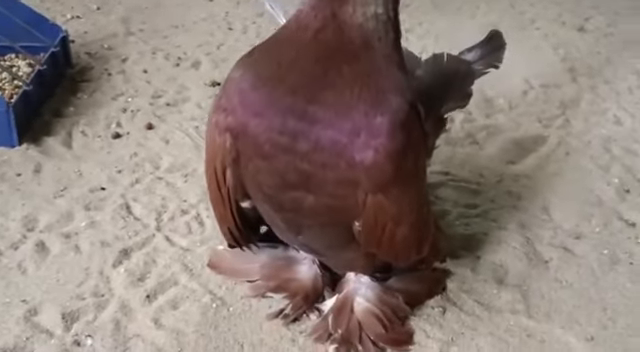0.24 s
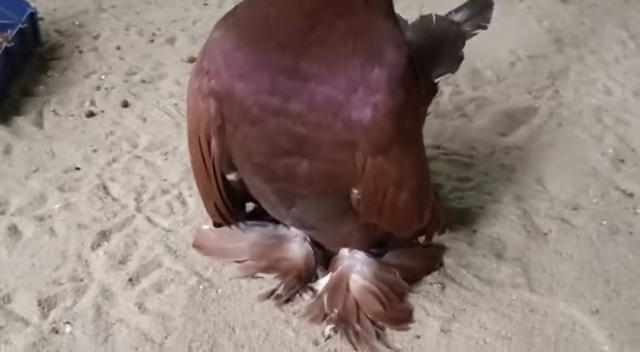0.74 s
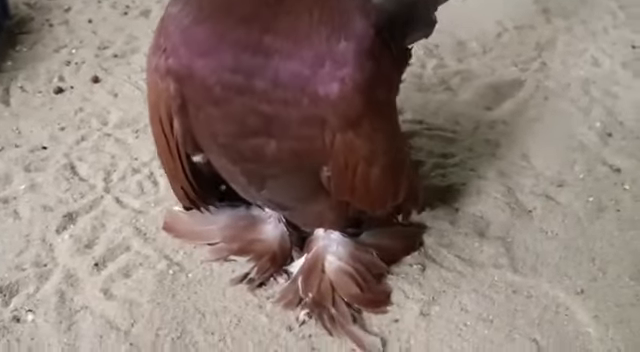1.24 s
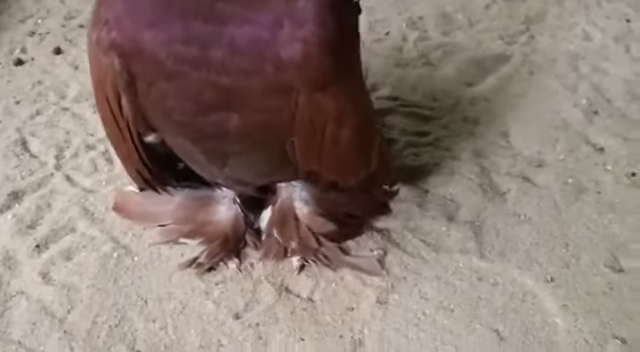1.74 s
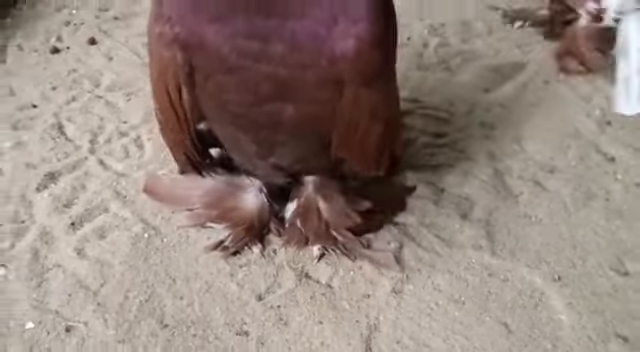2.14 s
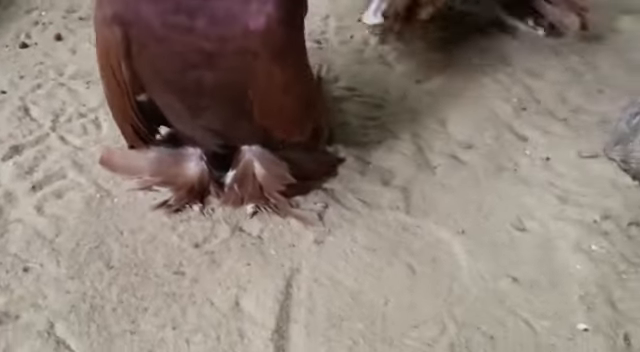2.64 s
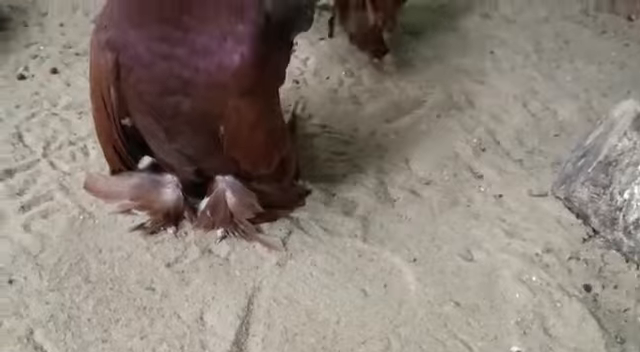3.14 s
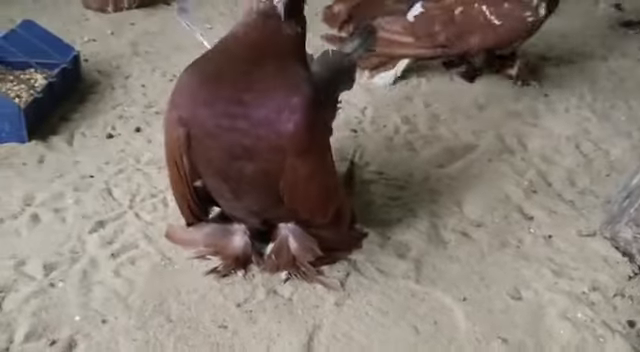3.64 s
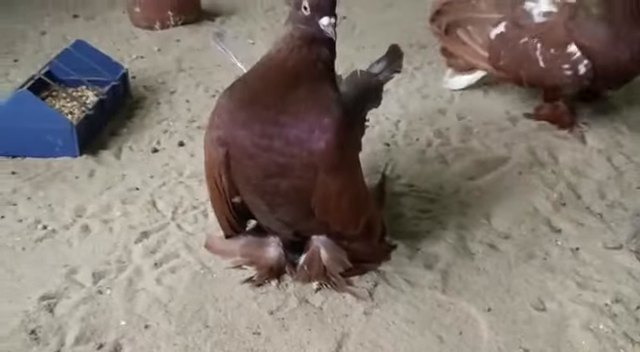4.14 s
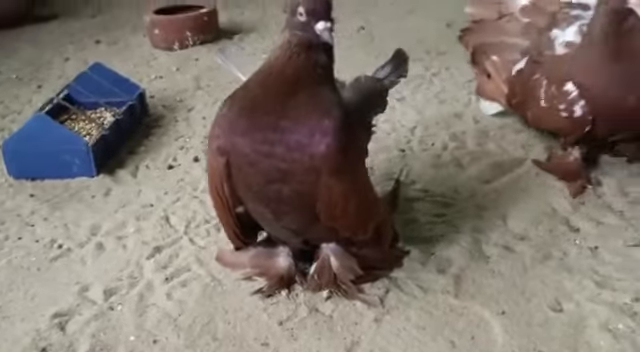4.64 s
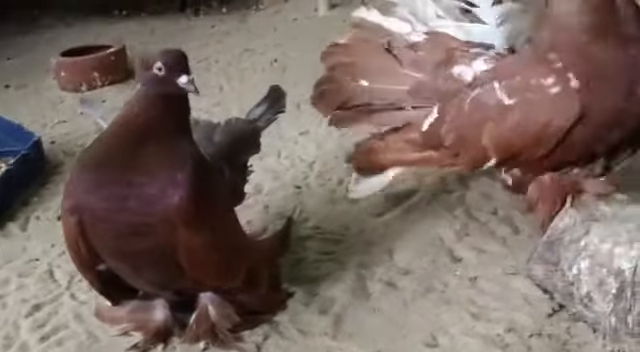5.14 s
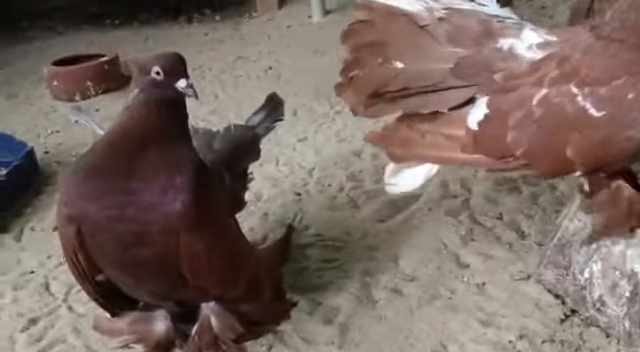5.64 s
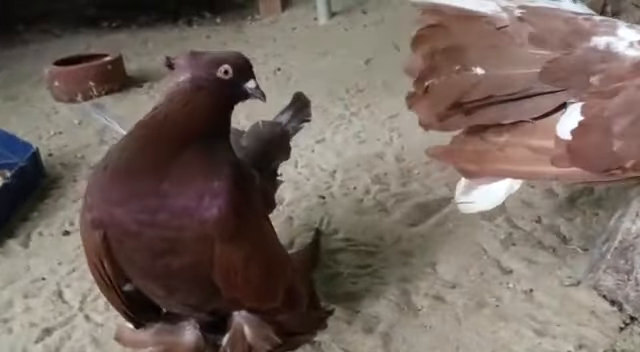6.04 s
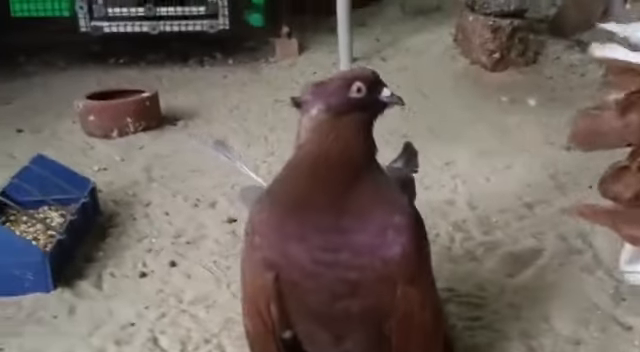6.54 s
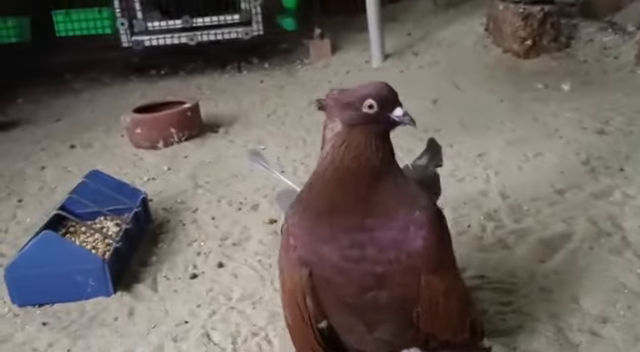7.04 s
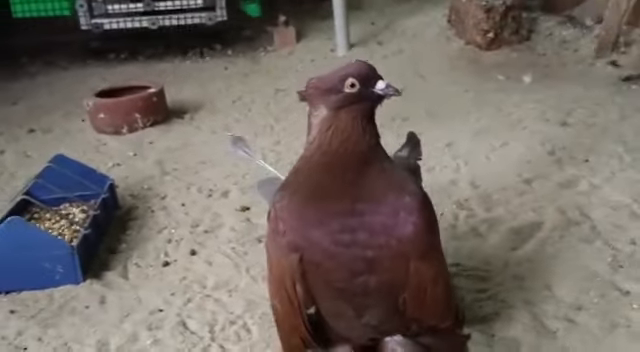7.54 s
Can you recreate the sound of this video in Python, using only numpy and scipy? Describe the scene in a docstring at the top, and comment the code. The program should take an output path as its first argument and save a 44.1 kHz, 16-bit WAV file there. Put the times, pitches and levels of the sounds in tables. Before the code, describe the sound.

Close in a small sandy loft, pigeons give short stuttered notes and long, fluttering, falling coos, low and muffled. Soft bumps come first, then a quick burst of wingbeats with sand scuffs. Claws rasp, then a sharp hard knock on the left stands out, followed by a thin sliding whistle. Hoarse young squeals and faint coos sit behind, over soft air noise and low hum.

```python
"""Pigeons court on the sandy floor of a small loft, close to a phone, over steady air noise and a low hum.
From the start short stuttered notes and long, throbbing, falling coos come and go: tones fluttered and
muffled by the crop. Young birds squeal hoarsely further back, faint coos murmur, and filtered noise makes
feet scuff and grit tick. A soft bump and two knocks on a board, rung from damped modes, come first; then
wings beat, claws rasp, harder knocks fall, and a thin whistle slides down and frays among later coos."""
import sys
import numpy as np
from scipy import signal
from scipy.fft import rfft, irfft, next_fast_len
from scipy.io import wavfile
from scipy.ndimage import map_coordinates

SR = 44100
rng = np.random.default_rng(int(sys.argv[2]) if len(sys.argv) > 2 else 0)


def inscribe(sig):
    """Save sig as 16-bit PCM at rate SR to the path in sys.argv[1].

    A 1-D sig is mono; a 2-D sig holds one channel per row.
    Samples are clipped to [-1, 1] before scaling.
    """
    pcm = np.round(np.clip(np.atleast_2d(sig).T, -1, 1) * 32767)
    wavfile.write(sys.argv[1], SR, pcm.astype(np.int16))


N = 343539
TIME = np.arange(N) / SR

# wing strokes close to the microphone, which also sweep the sand:
# [t/s, level/dB ahead of the trims in wings() and feet(), length/s]
WING_STROKES = [(1.726, -35, 0.037), (1.849, -21.5, .024), (1.88, -24, .043), (1.954, -17.5, 0.022),
                (1.999, -23, .028), (2.034, -25, 0.027), (2.095, -30.5, 0.045)]


def undb(db):
    """Decibels to gain."""
    return 10 ** (np.asarray(db) / 20)


def unit(x):
    """Scale to rms 1."""
    return x / np.sqrt(np.mean(x ** 2) + 1e-20)


def clock(length):
    """Sample times of a sound of this length in seconds."""
    return np.arange(max(int(length * SR), 16)) / SR


def colour(x, points):
    """Filter by a spectrum of [f/Hz, gain/dB] points, joined by straight lines over log frequency."""
    hz, db = np.transpose(points)
    size = next_fast_len(x.shape[-1] + 2048)
    f = np.maximum(np.fft.rfftfreq(size, 1 / SR), 1)
    gain = undb(np.interp(np.log(f), np.log(hz), db))
    return irfft(rfft(x, size) * gain, size)[..., :x.shape[-1]]


def brighten(x, db):
    """Lift or lower the top treble, by the full amount from 13 kHz up."""
    return colour(x, [(4000, 0), (13000, db)])


def butter(x, hz, kind, order=2):
    """Butterworth filter."""
    sos = signal.butter(order, np.minimum(hz, .45 * SR), kind, fs=SR, output="sos")
    return signal.sosfilt(sos, x)


def walk(rate):
    """Random wander of rms 1 that heads for a new value rate times a second."""
    steps = rng.standard_normal(N // 8)
    return unit(map_coordinates(steps, [TIME * rate], order=1, mode="wrap"))


def arch(t, length):
    """Swell and fade evenly over a length of time."""
    return np.sin(np.pi * np.clip(t / length, 0, 1)).clip(0) ** 1.2


def swell(u):
    """Quick rise and long fade as u runs from 0 to 1."""
    return np.sin(np.pi * u ** .7).clip(0) ** .8


def pan(x, left_db):
    """Place a sound in stereo, left_db louder on the left than on the right."""
    return x * undb(np.array([[left_db], [-left_db]]) / 2)


def add(out, start, x):
    """Mix a sound in from a start time in seconds, trimmed at both ends of the scene."""
    i = int(start * SR)
    x, i = x[..., max(-i, 0):], max(i, 0)
    out[..., i:i + x.shape[-1]] += x[..., :max(N - i, 0)]


def piece(x, t):
    """A random stretch of a long signal, as long as t."""
    i = int(rng.random() * (N - len(t)))
    return x[..., i:i + len(t)]


def room(x, t60, wet_db, lag=0):
    """Direct sound, reaching the left port lag samples late, and the diffuse ring of the loft (t60 in s)."""
    t = clock(0.99)
    onset = 1 - np.exp(-t / 0.00052)
    tail = rng.standard_normal((2, len(t))) * undb(-60 * t / t60) * onset
    tail /= np.sqrt(np.sum(tail ** 2, axis=1, keepdims=True))
    x = x * np.ones((2, 1))
    direct = np.array([np.interp(TIME - lag / SR, TIME, x[0]), x[1]])
    return direct + undb(wet_db) * signal.fftconvolve(x, tail, axes=1)[:, :N]


def syrinx(hz, depth, throb_hz, chance):
    """A nearly pure tone, nicked by an uneven flutter; its pitch wavers, and slips as the flutter chokes it."""
    flutter = np.cos(2 * np.pi * np.cumsum(throb_hz * np.exp(.3 * chance[0])) / SR)
    choke = np.clip(depth, 0, 1) * ((1 - flutter) / 2) ** 3
    waver = .04 * depth * chance[1]
    slip = .3 * choke * chance[2]
    phase = 2 * np.pi * np.cumsum(hz * (1 + waver + slip)) / SR
    rasp = .22 * depth * chance[3] * np.cos(phase)
    # the octave comes through when the pitch sinks far enough for it to fit the crop resonance
    octave_db = np.interp(hz, [200, 245, 275, 330], [-10, -14, -19, -24])
    tone = np.sin(phase) + rasp + undb(octave_db) * np.sin(2 * phase)
    return unit((1 - 1.3 * choke) * tone)


def crop(x):
    """The swollen crop behind a closed beak passes only the lows."""
    return butter(x, [170, 530], "band", order=6)


def coos():
    """Long coos and short notes, sung with closed beak: a fluttered syrinx tone through the crop."""
    # long coos, levels ahead of the crop: [t/s, length/s, opening f/Hz, settling/s, held f/Hz before sag,
    #  sag/(Hz/s), level/dB, attack/s, rise/s, fade/(dB/s), release/s, middle throb f/Hz,
    #  throb depth/0-1, left-right/dB]
    long_coos = [(0.169, 0.56, 410, .07, 340, 165.7, -31.5, .04, .13, 33, 0.074, 36.2, 0.81, 1),
                 (.724, 0.47, 454.3, .075, 354, 186.7, -37, 0.013, 0.13, 9.5, 0.138, 17.4, 0.39, -0.5),
                 (0.954, .515, 492, 0.04, 492, 597, -25.5, .055, 0.28, 78.5, 0.064, 26, 0.33, -2),
                 (2.799, 0.3, 295, 0.0994, 340, 60, -28.5, 0.014, 0.22, 13.5, 0.022, 29.6, 0.53, -0.5),
                 (4.11, 0.37, 445, 0.054, 334.8, 273, -28.5, 0.0094, .095, 22.5, 0.076, 24.9, 0.51, 3),
                 (4.937, .42, 505, .13, 344.3, 105, -29, 0.012, 0.36, 1.5, 0.028, 32, .6, 1.5),
                 (5.565, 0.51, 420, 0.12, 375.9, 99, -24.5, 0.013, 0.17, 7, 0.12, 36, 0.57, 1.5),
                 (7.095, .34, 430, .047, 343.7, 158.5, -32, 0.054, 0.057, 19.5, 0.09, 16.7, 0.28, 0)]
    # short stuttered notes, levels ahead of the crop: [t/s, middle f/Hz, level/dB, pop width/s]
    short_notes = [(0.051, 322, -31, 0.0052), (0.11, 305, -31, .007), (1.098, 392, -31.5, 0.0065),
                   (2.585, 326, -30, 0.005), (2.655, 309, -28, 0.0047), (2.708, 307, -30, 0.0084),
                   (2.767, 337, -29.5, 0.0039), (3.104, 304.6, -22.5, .008), (3.162, 294, -23, 0.0053),
                   (3.222, 283, -32.5, 0.0064), (3.273, 292.9, -33, 0.007), (3.774, 274, -33, 0.0037),
                   (3.886, 314, -30.5, 0.0028), (4.02, 292.5, -26.5, 0.0025), (4.43, 438, -27, 0.018),
                   (4.483, 466, -33, 0.0034), (4.564, 454, -29, 0.0052), (4.717, 338, -28.5, 0.0056),
                   (4.785, 327, -30.5, 0.00538), (4.846, 320, -31, 0.0039), (4.903, 321, -31.5, 0.0048),
                   (4.964, 325.4, -28, 0.0054), (5.371, 344.6, -23.5, 0.0096),
                   (5.416, 326.2, -23.5, 0.0045), (5.448, 338.2, -27, 0.0093),
                   (5.666, 399.4, -22.5, 0.0063), (6.657, 296, -35.5, 0.0073), (6.744, 338, -31.5, 0.0047),
                   (6.818, 313, -30, 0.0047), (6.889, 316.4, -34.5, 0.0046), (6.979, 304, -35.5, 0.0043)]
    start_db, end_edge_s = -12.5, 0.0031  # soft start of each coo, and the ramp that closes it
    release_db, release_drop = -12.5, .22  # level and share of the pitch lost together at the end
    faint_db = -31.5  # coos no louder than this come from further off and carry more of the room
    near, further = np.zeros((2, 2, N))
    chance = np.array([walk(50), walk(90), walk(110), walk(330)])
    for (start, length, opening_hz, settle_s, held_hz, sag, db, attack_s, rise_s, fade, release_s,
         throb_hz, depth, left_db) in long_coos:
        t = clock(length)
        release = np.clip(1 - (length - t) / release_s, 0, 1)
        # the pitch moves from its opening onto a slowly sagging tone and drops as the air runs out
        hz = held_hz - sag * t + (opening_hz - held_hz) * np.exp(-(t / settle_s) ** 4)
        hz = hz * (1 - release_drop * np.sin(np.pi / 2 * release) ** 2)
        effort_db = start_db * np.maximum(1 - t / rise_s, 0) - fade * np.maximum(t - rise_s, 0)
        effort_db = effort_db + release_db * release ** 2
        edges = np.clip(np.minimum(t / attack_s, (length - t) / end_edge_s), 0, 1)
        voice = syrinx(hz, depth, throb_hz, piece(chance, t))
        place = near if db > faint_db else further
        add(place, start, pan(voice * edges * undb(db + effort_db), left_db))
    for start, hz, db, pop_s in short_notes:
        t = clock(0.0611)
        u = t / t[-1]
        # a note pops out in a few cycles, then flutters on more weakly
        voice = syrinx(hz * (1.06 - .12 * u), .2 + .7 * u, 45, piece(chance, t))
        pop = np.exp(-(t / pop_s - 2) ** 2)
        add(near, start, voice * np.maximum(0.88 * pop, 0.36 * swell(u)) * undb(db))
    return room(crop(near), t60=.31, wet_db=-8, lag=8.8) + room(crop(further), t60=0.21, wet_db=-7)


def knocks():
    """Hard, dead blows on a board: a few quickly damped modes, duller where the contact is softer."""
    # knocks and small bumps: [t/s, level/dB, top f/Hz, left-right/dB]
    blows = [(0.518, -22.5, 5030, -3), (.856, -30.5, 2500, -3), (3.423, -24.5, 2200, 1),
             (4.64, -19.5, 3520, 19.5), (4.668, -15, 2200, 16), (4.6816, -3, 5940, 15),
             (5.9285, -19, 3750, -15.5), (6.36, -21.5, 4140, -13)]
    # what the board rings with: [f/Hz, level/dB, t60/s]
    board_modes = [(276, -13.5, 0.017), (660, -21.5, 0.011), (1097, -32.5, .035), (1815, -35.5, 0.041),
                   (3000, -26.5, 0.0031), (5560, -30.5, 0.0027), (13060, -18, .002)]
    out, t = np.zeros((2, N)), clock(.08)
    ring = sum(undb(db) * np.cos(2 * np.pi * hz * t) * undb(-60 * t / t60) for hz, db, t60 in board_modes)
    for start, db, top_hz, left_db in blows:
        add(out, start, pan(butter(ring, top_hz, "low", order=2) * undb(db), left_db))
    return room(out, t60=0.12, wet_db=-22)


def wings():
    """Each stroke throws a thump and a puff of turbulent air at the microphone; quick strokes thump higher."""
    # spectrum of the turbulent air: [f/Hz, gain/dB]
    gust = [(15, -48), (25, -1), (54, -2), (186, 6), (262, -4), (350, -9), (492, -22), (692, -20.5),
            (1200, -28), (2200, -95)]
    out, air = np.zeros(N), colour(rng.standard_normal(N), gust)
    for start, db, length in WING_STROKES:
        t = clock(2 * length)  # the puff trails on to twice the stroke
        puff = piece(air, t) * np.sin(np.pi * np.sqrt(t / t[-1])) ** 2
        thump = np.sin(2 * np.pi * 3 * t / length) * t * np.exp(-t / (length / 7))
        add(out, start, (unit(puff) + undb(-6) * unit(thump)) * undb(db - 5))
    return room(pan(butter(out, 40, "high"), -1.5), t60=.15, wet_db=-18, lag=8)


def feet():
    """Sand grains crackle under dragged foot feathers and wing sweeps; single bits of grit tick."""
    # feathered feet dragged over sand: [t/s, length/s, hiss level/dB, body level/dB, top treble/dB]
    drags = [(-.02, 0.058, -52.5, -65, -17), (0.28, 0.062, -55.5, -57, -12),
             (0.444, 0.065, -61, -72, -13.5), (1.12, 0.059, -51.5, -66, -16), (1.472, 0.14, -76, -57, -8),
             (1.676, 0.52, -52.5, -52.5, -0.5), (2.094, 0.3, -77.5, -75, 13),
             (3.277, 0.14, -56.5, -61.5, 1), (3.545, 0.1, -66, -46.5, -4.5), (3.611, 0.16, -57, -44.5, -7),
             (4.106, .13, -48.5, -46.5, -20.5), (4.659, 0.021, -64, -33.5, 10),
             (4.946, 0.18, -53.5, -60, -12), (5.734, 0.063, -53.5, -79, -4.5),
             (5.971, 0.03, -56, -70, -4.5), (6.342, 0.077, -59.5, -65, -4),
             (6.915, 0.29, -59.5, -66.5, 7.5), (7.314, 0.046, -58.5, -64, 0.5),
             (7.545, 0.036, -53, -61, 4.5)]
    # grit ticking under claws and beaks: [t/s, level/dB, top treble/dB]
    grit = [(0.5127, -39.5, 0.5), (1.076, -39, -3.5), (1.4706, -37.5, 0), (1.494, -29.5, -10),
            (1.5364, -32.5, -6), (1.736, -32, 2), (1.782, -43.5, 6), (1.6, -40.5, -6), (1.991, -29, -14),
            (3.19, -45, -5), (4.27, -43, -14), (5.2345, -41.5, -2.5), (5.247, -40.5, -2), (5.2955, -42, 0),
            (5.3214, -40.5, -7), (6.6144, -49.5, 5), (6.984, -44.5, -1), (7.511, -59, 16)]
    # spectrum of the sand's hiss: [f/Hz, gain/dB]
    sand = [(1060, -54), (1800, -2.5), (2500, -10.5), (3000, -3), (6180, -14.5), (7360, -15),
            (10300, -21.5), (11400, -26.5), (12800, -16.5), (15200, -19), (16000, -45)]
    tick_t60_s = 0.031
    # sweeps of the wings over the sand grow by sweep_growth dB for each dB of the stroke
    sweep_s, sweep_hiss_db, sweep_body_db, sweep_growth = 0.035, -34, -28, 0.56
    out = np.zeros((2, N))
    grains = rng.standard_normal((3, N)) * undb(4 * walk(1500))
    grains = grains[:2] + 0.58 * grains[2]  # the third noise is common to both sides
    hiss = unit(colour(grains, sand))
    body_points = [(200, -17.5), (650, 6.5), (1200, -1.5), (3200, -7.5), (5000, -20.0), (10000, -51.5)]
    body = unit(colour(grains, body_points))
    catches = undb(2.5 * walk(80))
    sweeps = [(start, sweep_s, sweep_hiss_db + sweep_growth * db, sweep_body_db + sweep_growth * db, 0)
              for start, db, _ in WING_STROKES]
    for start, length, hiss_db, body_db, top_db in drags + sweeps:
        t = clock(length)
        rub = piece(hiss, t) * undb(hiss_db) + piece(body, t) * undb(body_db)
        add(out, start, brighten(rub, top_db) * arch(t, length) * piece(catches, t))
    for start, db, top_db in grit:
        t = clock(0.2)
        snap = np.minimum(t / 0.00058, 1) * undb(-60 * t / tick_t60_s)
        crack = (piece(hiss, t) + undb(-8.5) * piece(body, t)) * snap
        add(out, start, brighten(crack, top_db) * undb(db))
    return room(out, t60=0.29, wet_db=-4.5, lag=12)


def scratches():
    """A claw catches, rasps in a narrow band of noise and slips free."""
    # claw scratches: [t/s, length/s, centre f/Hz, opening level/dB]
    rasps = [(3.276, 0.0626, 4260, -56), (3.316, 0.054, 4780, -56), (3.535, 0.049, 4840, -54),
             (3.653, 0.27, 2960, -57)]
    out = np.zeros(N)
    for start, length, hz, db in rasps:
        t = clock(length)
        rasp = unit(butter(rng.standard_normal(len(t)), [hz / 1.17, hz * 1.17], "band"))
        add(out, start, rasp * np.minimum(t / 0.0041, 1) * undb(db - 27 * (t / length) ** 2))
    return room(out, t60=0.35, wet_db=0.5)


def youngsters():
    """Young birds further back squeal: sinking tones made hoarse by fast random shaking of the pitch."""
    # squeals: [t/s, length/s, opening f/Hz, middle level/dB, hoarseness/Hz rms]
    squeals = [(-.15, 0.37, 3010, -59, 83), (0, 0.5, 1926, -65, 120), (0.658, .16, 2996, -64.5, 170),
               (.88, 0.63, 3423, -60, 564), (1.153, 0.43, 1877, -64, 89.4), (1.579, 0.27, 1336, -59.5, 50),
               (1.601, 0.57, 1941, -54, 100), (1.93, 0.797, 3086, -54, 48), (2.28, 0.53, 1950, -56.5, 150),
               (2.66, 0.35, 1761, -61, 75), (2.682, .25, 2520, -69.5, 70), (2.836, 0.33, 3170, -69, 90),
               (3.146, .13, 2780, -59.5, 120), (4.217, 0.48, 2026, -54, 190), (4.702, 0.33, 1997, -63, 100),
               (4.982, 0.8, 3202, -50.5, 60), (4.98, 0.74, 3930, -65, 500), (6.646, 0.3, 1834, -61.5, 64.6)]
    sink, sink_s = .17, .55  # share of the pitch each squeal sinks toward losing, and the time constant
    out, shake, flicker = np.zeros(N), walk(450), walk(35)
    for start, length, opening_hz, db, hoarse_hz in squeals:
        t = clock(length)
        hz = opening_hz * (1 - sink * (1 - np.exp(-t / sink_s))) + hoarse_hz * piece(shake, t)
        tone = np.sin(2 * np.pi * np.cumsum(hz) / SR)
        add(out, start, tone * swell(t / t[-1]) * undb(db + 3.5 * piece(flicker, t)))
    return room(out, t60=0.33, wet_db=3.5, lag=10.3)


def whistle():
    """One thin clear whistle with a faint octave; its pitch slides along a curve and frays as it ends."""
    # path of the whistle: [t/s, f/Hz, level/dB ahead of a 2 dB lift]
    path = [(4.655, 5080, -62), (4.73, 5185, -56), (4.79, 5200, -53), (4.9, 5150, -59), (4.97, 4700, -61),
            (5.03, 3400, -64)]
    s, hz, db = np.transpose(path)
    fray_hz = np.interp(TIME, s[-3:], [20, 220, 300])
    phase = 2 * np.pi * np.cumsum(np.interp(TIME, s, hz) + fray_hz * walk(450)) / SR
    tone = np.sin(phase) + undb(-24.0) * np.sin(2 * phase)
    level_db = np.interp(TIME, s, db, left=-150, right=-150) + 2.0
    return room(tone * undb(level_db), t60=0.3, wet_db=0.0)


def back_of_loft():
    """Coos and a soft bump at the back, muffled and wet with the room, over a fainter murmur; all sag."""
    # coos from the back of the loft, and one short soft bump at 0.453 s made with the same tone,
    # levels ahead of the muffling: [t/s, length/s, middle f/Hz, level/dB]
    back_sounds = [(0.423, 0.3, 424.5, -50), (0.453, 0.03, 630, -42), (1.36, 0.19, 389, -42),
                   (2.382, 0.25, 397.5, -48.5), (2.702, 0.1393, 545.6, -49.5), (2.82, .17, 510, -51.5),
                   (4.853, 0.12, 637, -51), (5.565, 0.169, 485, -43), (3.05, 0.18, 512, -48.5),
                   (4.252, .29, 448.4, -40), (4.698, 0.28, 412, -46), (5.23, 0.066, 467, -43),
                   (6, 0.098, 476, -39.5), (7.398, 0.081, 386.4, -46.5), (7.617, .21, 329.4, -50.5)]
    sag_hz_per_s = 194.2
    # the rest of the flock: coos at random times, spread over an octave around murmur_hz
    murmur_count, murmur_s, murmur_hz, murmur_db = 26, .35, 300.6, -50.5
    out, chance = np.zeros(N), np.array([walk(50), walk(90), walk(110), walk(300)])
    murmur = [(when * N / SR, murmur_s, murmur_hz * 2 ** (pitch - .5), murmur_db)
              for when, pitch in rng.random((murmur_count, 2))]
    for start, length, hz, db in back_sounds + murmur:
        t = clock(length)
        tone = syrinx(hz - sag_hz_per_s * (t - length / 2), .4, 30, piece(chance, t))
        add(out, start, tone * arch(t, length) * undb(db))
    return room(butter(out, 620, "low", order=5), t60=0.3, wet_db=-7)


def loft():
    """Air noise whose hiss swells and sinks, a low hum and a thin high hiss that comes and goes."""
    # spectrum of the air noise: [f/Hz, gain/dB]
    air_points = [(25, -16.5), (85, 0), (149, -5.5), (265, -1), (416, -20), (600, -21), (950, -27.5),
                  (1840, -26.5), (3000, -29), (6380, -45.5), (9900, -54), (11300, -58.5), (13000, -52.5),
                  (15300, -50), (16000, -75.5)]
    # lines of the low hum, wavering in pitch and level: [middle f/Hz, relative level/dB]
    hum_lines = [(97, -2), (119, -6), (166, -7)]
    # course of the hum: [t/s, level/dB]
    hum_course = [(0, -49.5), (2.5, -51), (5.9, -57.5), (6.25, -45), (7.79, -47)]
    mid, side = colour(rng.standard_normal((2, N)), air_points)
    # the sides part only above the lows
    side = butter(side, 260, "high", order=1) * np.array([[1], [-1]])
    air = unit(mid + side) * undb(-49 + walk(5))
    rumble = colour(air, [(600, 0), (1500, -40)])
    air = rumble + (air - rumble) * undb(1.2 * walk(7))
    hum = unit(sum(np.sin(2 * np.pi * np.cumsum(hz + 3 * walk(14)) / SR) * undb(db + 2 * walk(10))
                   for hz, db in hum_lines))
    low = hum * undb(np.interp(TIME, *np.transpose(hum_course)))
    thin = unit(butter(rng.standard_normal((2, N)), [7950, 8400], "band")) * undb(3 * walk(5))
    return air + low + thin * undb(-83)


def scene():
    """All that sounds in the loft, near and far."""
    calls = coos() + youngsters() + whistle() + back_of_loft()
    return calls + knocks() + wings() + feet() + scratches() + loft()


def record(dry):
    """The phone's left port hears less of the high treble than the right; both are cut off at the top."""
    left = colour(dry[0], [(4500, 0.5), (8000, -1.0), (15000, -5.5)])
    right = colour(dry[1], [(4500, 1.07), (8000, 3.16), (15000, 4.5)])
    top_cut = signal.ellip(8, .2, 70, 15800, fs=SR, output="sos")  # low-pass edge in Hz
    return signal.sosfilt(top_cut, [left, right])


dry = scene()
out = record(dry)
inscribe(out)
```